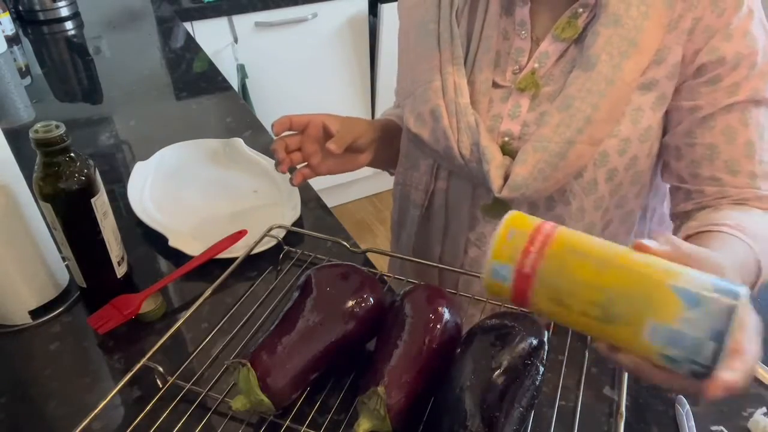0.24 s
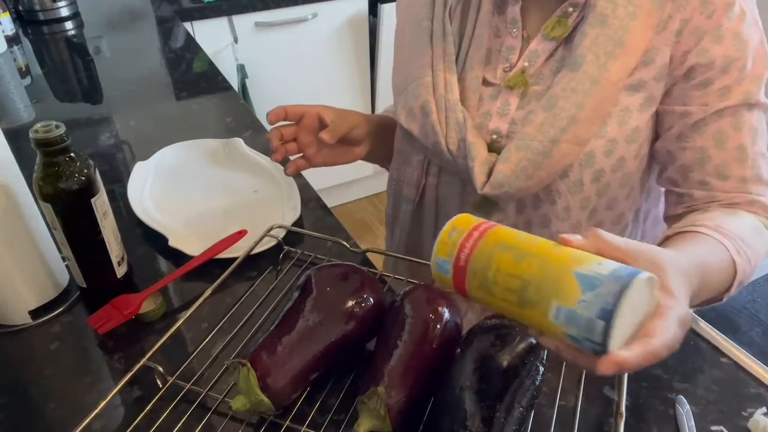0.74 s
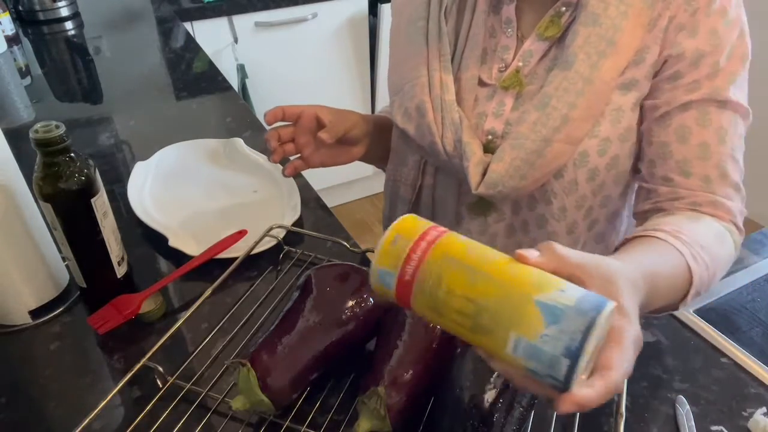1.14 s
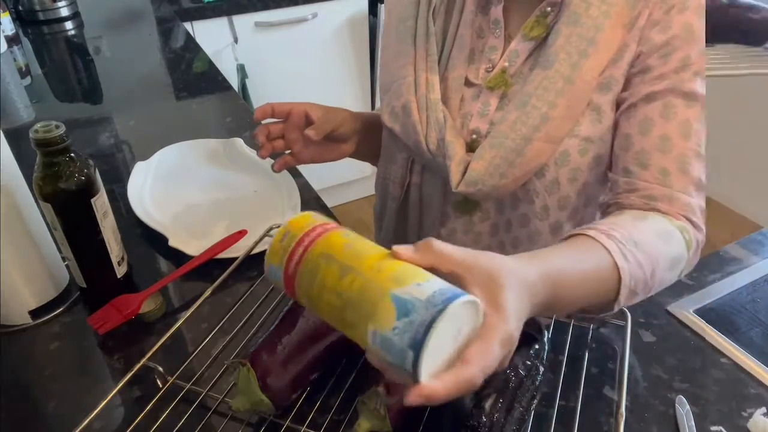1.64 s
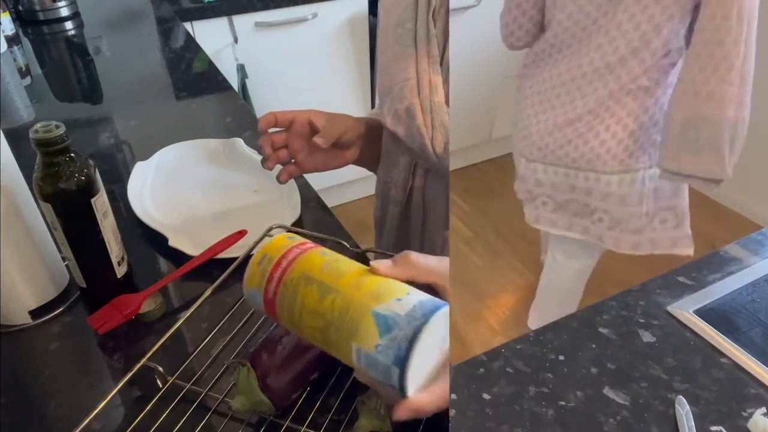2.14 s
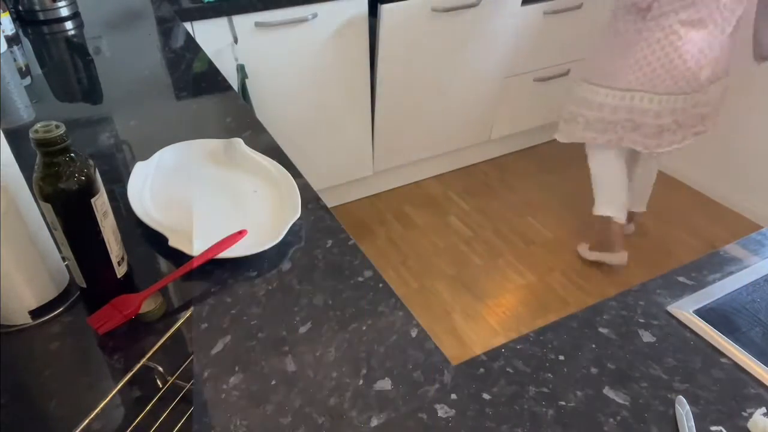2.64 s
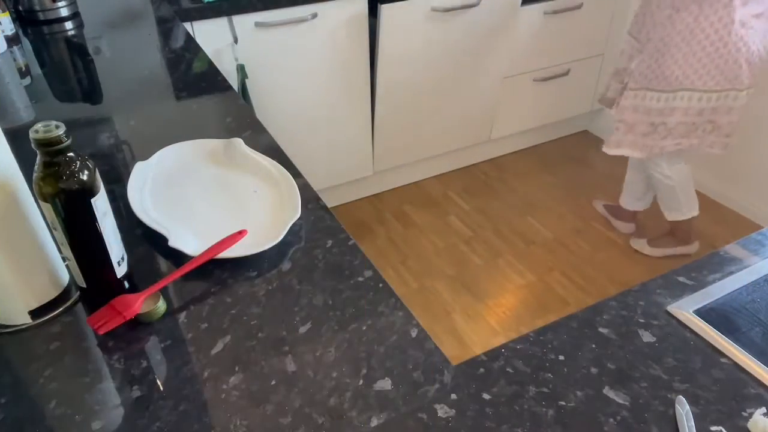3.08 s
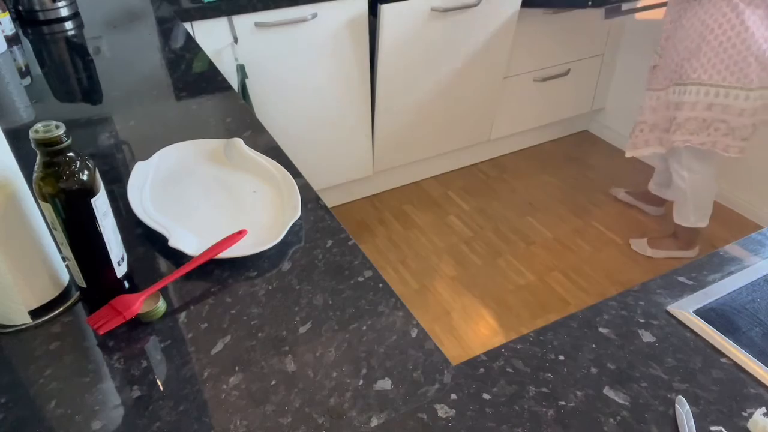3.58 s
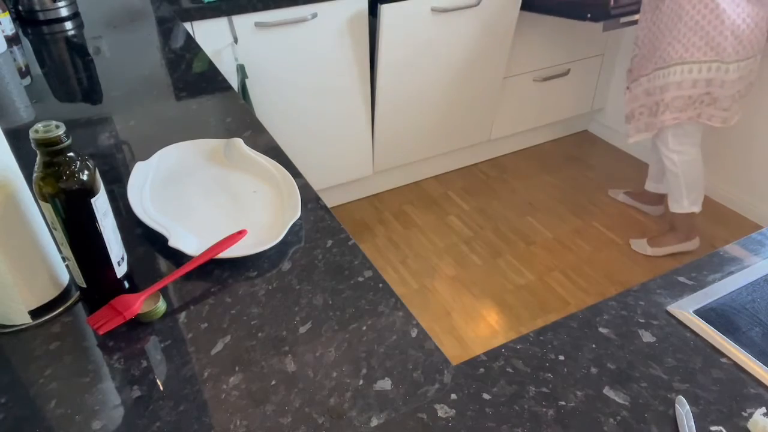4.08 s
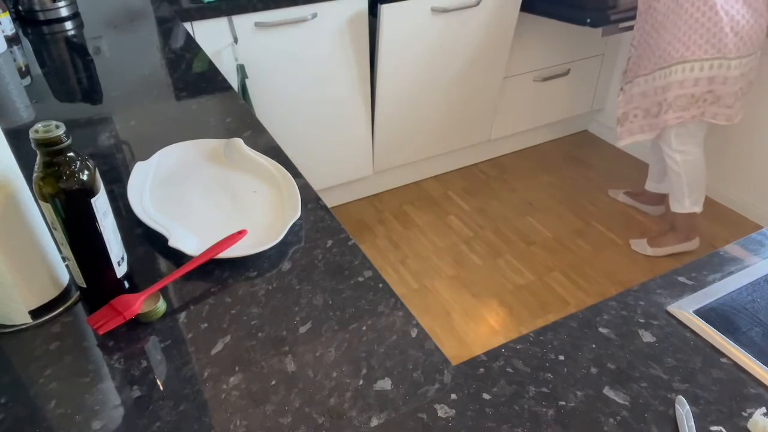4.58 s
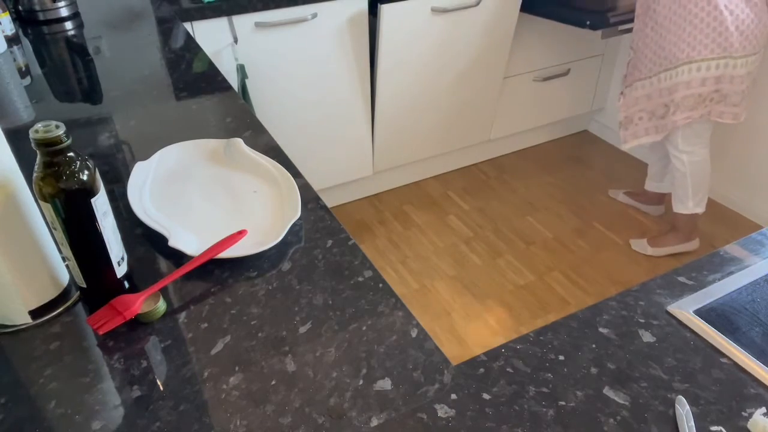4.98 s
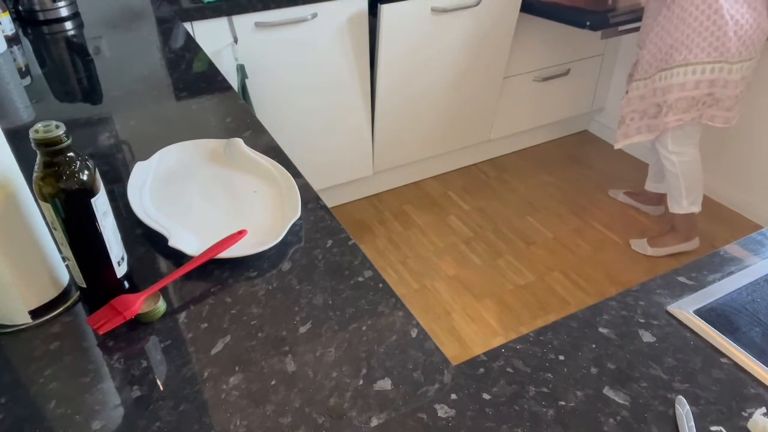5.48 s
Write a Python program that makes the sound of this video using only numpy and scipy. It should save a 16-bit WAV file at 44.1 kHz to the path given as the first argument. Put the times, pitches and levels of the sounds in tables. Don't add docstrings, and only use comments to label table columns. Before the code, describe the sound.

Quick bright shakes of a salt container give way to an oven door clicking open and metal trays banging across the room.

```python
import sys
import numpy as np
from scipy import signal
from scipy.fft import rfft, irfft, next_fast_len
from scipy.io import wavfile
from scipy.ndimage import uniform_filter1d

SR = 44100
rng = np.random.default_rng(int(sys.argv[2]) if len(sys.argv) > 2 else 0)


def log_audio(samples):
    frames = np.atleast_2d(samples).T
    limited = np.clip(frames, -1, 1)
    pcm = np.round(limited * 32767).astype(np.int16)
    wavfile.write(sys.argv[1], SR, pcm)


def decibels_to_gain(level_db):
    exponent = np.asarray(level_db, float) / 20
    return 10 ** exponent


N = 252252
T = np.arange(N) / SR
AGE = np.arange(SR // 2) / SR
LONG = next_fast_len(N, True)
HZ = np.fft.rfftfreq(LONG, 1 / SR)


def evened(x):
    return x / np.sqrt(np.mean(x ** 2) + 1e-20)


def read(points, hz, column=1):
    table = np.transpose(points)
    return np.interp(np.log(hz + 1), np.log(table[0] + 1), table[column])


def colour(x, points):
    octaves_outside = np.log2(np.clip(HZ, points[0][0], points[-1][0]) / (HZ + 1))
    gain = decibels_to_gain(read(points, HZ) - 24 * abs(octaves_outside))
    return evened(irfft(rfft(x, LONG) * gain, LONG)[..., :N])


def ring(x, modes):
    out = 0
    for hz, width_hz, db in modes:
        r = np.exp(-np.pi * width_hz / SR)
        poles = [1, -2 * r * np.cos(2 * np.pi * hz / SR), r * r]
        out = out + decibels_to_gain(db) * (1 - r) * signal.lfilter([1, 0, -1], poles, x)
    return out


def grains(per_s, spread_db):
    luck = rng.random((2, N)) * SR / per_s
    hit = luck < 1
    size = rng.standard_normal((2, N)) * hit
    size[hit] *= decibels_to_gain(spread_db * np.minimum(-np.log(luck[hit] + 1e-9), 5))
    return evened(size)


def wander(rate_hz, depth_db, t=T):
    knots = rng.standard_normal(round(N / SR * 200))
    return np.interp(t * rate_hz, np.arange(len(knots)), decibels_to_gain(depth_db * knots))


def blow(db, t60_s, rise_s):
    return (1 - np.exp(-AGE / rise_s)) * decibels_to_gain(db - 60 * AGE / t60_s)


def stroke(start_s, length_s, edge_s, sag_db_per_s):
    edge = np.clip(np.minimum(T - start_s, start_s + length_s - T) / edge_s + 1, 0, 1)
    return edge * decibels_to_gain(-sag_db_per_s * np.clip(T - start_s, 0, length_s))


def add(mix, start_s, sound):
    part = mix[..., round(start_s * SR):][..., :sound.shape[-1]]
    part += sound[..., :part.shape[-1]]


def ports(pair, table):
    left, own = rfft(pair, LONG)
    likeness = np.clip(read(table, HZ), 0, 1)
    shift = np.exp(1j * np.pi * read(table, HZ, column=2))
    right = likeness * left * shift + np.sqrt(1 - likeness ** 2) * own
    tilt = decibels_to_gain(read(table, HZ, column=3) / 2)
    return irfft(np.array([left * tilt, right / tilt]), LONG)[:, :N]


# frequency in Hz, t60 in seconds.
ROOM_T60 = [(120, 0.35), (500, 0.34), (2000, 0.29), (6000, 0.2), (14000, 0.19)]


def room(x, tail_db):
    taps = np.zeros((2, SR // 2))
    at = np.arange(300, SR // 2 - 20, 20)
    at = at + rng.integers(0, 20, (2, len(at)))
    np.put_along_axis(taps, at, rng.choice([-1., 1.], at.shape), 1)
    hz, t, z = signal.stft(taps, SR, nperseg=512)
    decay = decibels_to_gain(-60 * t / read(ROOM_T60, hz)[:, None])
    tail = signal.istft(z * decay, SR, nperseg=512)[1]
    tail = tail / np.linalg.norm(tail[0])
    return x + decibels_to_gain(tail_db) * signal.oaconvolve(x, tail, axes=1)[:, :N]


# frequency in Hz, level in dB per Hz.
HUM_NEAR_SPECTRUM = [(25, -15), (59, -0.5), (110, -6), (153, -15.5), (300, -27.5), (380, -19.5),
                     (660, -22.5), (800, -18), (1160, -30.5), (2200, -33.5)]
HUM_FAR_SPECTRUM = [(50, -35), (78, -19), (105, 0), (205, -2.5), (300, -13), (400, -23.5), (600, -27),
                    (950, -23), (1200, -22.5), (2100, -29), (3000, -34), (5000, -48), (9000, -49),
                    (13000, -52)]
# time in seconds, share of the far scene 0-1.
FAR_SHARE = [(2.0, 0.09), (2.4, 0.55), (2.8, 0.84), (3.2, 0.99)]


def hum():
    near_db, far_db = -52.5, -52.5
    far = np.clip(np.interp(T, *np.transpose(FAR_SHARE)), 0, 1)
    noise = rng.standard_normal((2, N))
    near_hum = decibels_to_gain(near_db) * colour(noise, HUM_NEAR_SPECTRUM)
    far_hum = decibels_to_gain(far_db) * colour(noise[:, ::-1], HUM_FAR_SPECTRUM)
    return (1 - far) * near_hum + far * far_hum


# start in seconds, level in dB, panel pitch in Hz.
PANEL_THUDS = [(2.99, -46, 105), (3.12, -44, 290), (3.14, -46, 114), (3.49, -41.5, 250), (3.54, -45.5, 228),
               (4.016, -26, 265), (4.045, -36, 295), (4.07, -39, 290), (4.15, -39.5, 275),
               (4.218, -33.5, 239.5), (4.225, -36.5, 134.3), (4.245, -33, 294.5), (4.49, -38, 215),
               (4.68, -27, 240), (4.69, -18.5, 230), (4.692, -17.5, 137.9), (4.71, -25.5, 290),
               (4.77, -31, 140.3), (4.782, -29.5, 285), (4.86, -37, 290), (4.994, -28, 135),
               (5.005, -25.5, 250), (5.035, -29, 295), (5.05, -33, 160), (5.08, -33.5, 240),
               (5.145, -36.5, 220), (5.30, -40, 277), (5.508, -30, 265), (5.54, -42, 300),
               (5.71, -32.5, 280)]
# start in seconds, length in seconds, level in dB.
CABINET_SHAKING = [
    (3.1, .4, -48),
    (3.65, .3, -62),
    (4.12, .55, -49),
    (4.72, .17, -44),
    (5.03, .7, -48),
]
# frequency in Hz, level in dB.
RUMBLE_SPECTRUM = [(70, -20), (110, 1), (150, -1.5), (190, -6), (250, 0.5), (320, -6), (430, -21),
                   (550, -30.5)]
SHUDDER_SPECTRUM = [(170, -9), (260, 0), (400, -1), (520, -9)]


def cabinet():
    cycles_per_60_db, rise_s = 23, .008
    shudder_db, shudder_t60_s = -16.5, .18
    shaking_edge_s, shaking_sag_db_per_s = .1, 9
    level = 0
    for start_s, length_s, db in CABINET_SHAKING:
        level = level + decibels_to_gain(db - 4.5) * stroke(start_s, length_s, shaking_edge_s, shaking_sag_db_per_s)
    noise = rng.standard_normal((2, N))
    shudder = np.zeros(N)
    out = level * wander(25, 2.9) * colour(noise, RUMBLE_SPECTRUM)
    for start_s, db, hz in PANEL_THUDS:
        add(out, start_s, blow(db + 7, cycles_per_60_db / hz, rise_s) * np.sin(2 * np.pi * hz * AGE))
        add(shudder, start_s, blow(db + shudder_db, shudder_t60_s, rise_s))
    return out, shudder * colour(noise[:, ::-1], SHUDDER_SPECTRUM)


# frequency in Hz, level in dB.
CLATTER_SPECTRUM = [(400, -9), (600, -10), (900, 0), (2500, -4), (5000, -12.5), (8000, -19)]
TICK_SPECTRUM = [(3500, -14), (6000, -3), (9000, -5), (12000, -5), (13400, -6), (15500, -14)]
# start in seconds, click in dB, struck part in Hz, brightness in dB.
LATCH_CLICKS = [(2.922, -56, 1400, 3.5), (2.974, -37.5, 1250, -26), (3.010, -43, 1300, -7.5),
                (3.078, -38, 1900, -.6), (3.098, -42, 950, -14), (3.139, -31.5, 1850, -18),
                (3.284, -57, 4000, -5), (3.290, -46.5, 740, -26), (3.44, -53, 950, -6),
                (3.462, -45.5, 2100, -1.5), (3.476, -31, 3800, -0.6), (3.498, -39, 1090, -10)]


def latch():
    t60_s, base_rise_s, rise_s_per_dull_db = .13, .0014, .00012
    out = np.zeros((2, N))
    impacts = grains(14000, 1.3)
    broad = colour(impacts, CLATTER_SPECTRUM)
    ticks = colour(impacts, TICK_SPECTRUM)
    for k, (start_s, db, hz, bright_db) in enumerate(LATCH_CLICKS):
        first = k * len(AGE) // 2
        mine = slice(first, first + len(AGE))
        rise_s = base_rise_s + rise_s_per_dull_db * abs(bright_db)
        part = evened(ring(impacts[:, mine], [(hz, 0.2 * hz, 0), (0.61 * hz, 0.29 * hz, -6)]))
        add(out, start_s, blow(db - 6.5, t60_s, rise_s) * (part + 0.3 * broad[:, mine]))
        add(out, start_s, blow(db - 1.5 + bright_db, .8 * t60_s, 0.52 * rise_s) * ticks[:, mine])
    return out


# frequency in Hz, width in Hz, level in dB.
TRAY_MODES = [(416, 70, -16), (835, 60, -.3), (1060, 75, -4.5), (1250, 60, -3), (1496, 60, -11),
              (1754, 60, -7), (1987, 38, 1.5), (2080, 40, -8), (2333, 32, -5.5), (2683, 91, -3),
              (3160, 69, -6.5), (3800, 99, -6), (4203, 100, -4.5), (5290, 66, -10.5), (6250, 71, -10),
              (6770, 77, -10), (8250, 110, -16)]


def metal(strength, brightness, impacts):
    pitch_drift_db = .12
    body = strength * decibels_to_gain(-2.5) * wander(60, 2.3) * colour(impacts, CLATTER_SPECTRUM)
    late = slice(3 * SR, N)
    drive = (strength * impacts)[:, late] / np.std(ring(impacts[:1, :SR // 4], TRAY_MODES))
    for hz, width_hz, db in TRAY_MODES:
        phase = 2 * np.pi * hz * np.cumsum(wander(6, pitch_drift_db, T[late])) / SR
        turn = np.exp(1j * phase)
        push = decibels_to_gain(db - .6) * wander(24, 3.5, T[late]) * wander(7, 2.6, T[late])
        r = np.exp(-np.pi * width_hz / SR)
        swing = signal.lfilter([1 - r], [1, -r], push * turn.conj() * drive)
        body[:, late] += (turn * swing).real
    return body + brightness * wander(60, 2.4) * colour(impacts, TICK_SPECTRUM)


# start in seconds, rattle in dB, brightness in dB, t60 in seconds.
TRAY_KNOCKS = [(4.012, -32, -33, .16), (4.11, -47.5, -13, .21), (4.142, -31, -10.5, .17),
               (4.214, -23, -10, .27), (4.239, -28.5, -15.5, .07), (4.638, -41, -9, .14),
               (4.666, -31, -14, .14), (4.677, -16.5, -13.5, .14), (4.692, -15.5, -17, .15),
               (4.779, -26, -24, .14), (4.860, -27, -37, .08), (4.991, -24, -19.5, .17),
               (5.011, -21.5, -17.5, .14), (5.039, -26, -14, .085), (5.289, -38, -16, .11),
               (5.458, -31.5, -21, .32), (5.509, -33, -22, .095), (5.609, -50, -17, .13)]
# start in seconds, length
# in seconds, scrape in dB, brightness in dB.
DOOR_AND_TRAY_SLIDES = [(3.19, .03, -64, -14), (3.23, .16, -79, 8), (3.295, .015, -62, -8), (3.41, .06, -62, -2),
                        (4.29, .03, -50, -15), (4.35, .03, -50, -4), (4.405, .15, -42, -1), (4.635, .04, -47, -9),
                        (4.885, .02, -54, -28), (4.975, .015, -52, -13), (5.09, .28, -45, -6), (5.42, .03, -53, -9),
                        (5.54, .015, -55, -13), (5.625, .02, -58, -11)]


def trays():
    knock_rise_s = .0038
    slide_edge_s, sag_db_per_s, dulling_db_per_s = .045, 8, 40
    strength, bright = np.zeros((2, N))
    for start_s, db, bright_db, t60_s in TRAY_KNOCKS:
        add(strength, start_s, blow(db - 9.5, t60_s, knock_rise_s))
        add(bright, start_s, blow(db - 2.5 + bright_db, 0.92 * t60_s, .6 * knock_rise_s))
    for start_s, length_s, db, bright_db in DOOR_AND_TRAY_SLIDES:
        strength += decibels_to_gain(db - 2.1) * stroke(start_s, length_s, slide_edge_s, sag_db_per_s)
        bright += decibels_to_gain(db + bright_db) * stroke(start_s, length_s, slide_edge_s, dulling_db_per_s)
    return metal(strength, bright, grains(11000, 1.63))


# start in seconds, level in dB, t60 in seconds, spacing of echo dips in Hz.
DISH = (5.669, -38, 0.5, 4900)
# frequency in Hz, level in dB.
DISH_SPECTRUM = [(500, -7), (850, 6.5), (1600, -13.5), (2900, -5.5), (4300, 0), (5000, -14), (5900, -3),
                 (8100, -8.5), (11000, -12.5), (15500, -12)]


def clack():
    start_s, db, t60_s, dip_hz = DISH
    chatter = colour(grains(14000, 1.1), DISH_SPECTRUM)[:, :len(AGE)]
    chatter = (chatter[0] + .45 * chatter[::-1]) * decibels_to_gain([[1.1], [-1.1]])
    echo = .85 * np.roll(chatter, round(SR / dip_hz), axis=1)
    out = np.zeros((2, N))
    add(out, start_s, blow(db, t60_s, .003) * (chatter - echo))
    return out


def patchy(x, depth_db):
    z = signal.stft(x[:, :N // 2 + SR // 2], nperseg=256)[2]
    patches = rng.standard_normal(z.shape[1:])
    patches = uniform_filter1d(patches, size=3, axis=0)
    patches = uniform_filter1d(patches, size=9, axis=1)
    part = signal.istft(z * decibels_to_gain(depth_db * evened(patches)), nperseg=256)[1]
    return np.pad(evened(part), [(0, 0), (0, N - part.shape[1])])


# peak in seconds, level in dB.
SHAKE_STROKES = [(0.007, -44), (0.083, -45), (0.23, -36.5), (0.319, -42.5), (0.459, -41.5), (0.543, -43),
                 (0.615, -37), (0.717, -42), (0.79, -40.5), (0.882, -37.5), (0.959, -40.5), (1.058, -37),
                 (1.127, -39), (1.226, -36.5), (1.303, -38.5), (1.401, -38.5), (1.463, -38.5), (1.556, -40),
                 (1.632, -36.5), (1.716, -38), (1.789, -40), (1.877, -42), (1.944, -39.5), (2.051, -42),
                 (2.116, -46), (2.205, -41.5), (2.288, -45)]
# peak in seconds, level in dB, rise in seconds, fall in seconds.
TRICKLES = [
    (.135, -51.5, .017, .035),
    (.405, -51, .03, .04),
    (2.37, -56.5, .035, .07),
    (2.48, -69.5, .06, .06),
    (2.6, -56.5, .089, .17),
    (2.72, -53, .11, .071),
    (2.84, -67.5, .054, .11),
]
# time in seconds, level in dB.
DRUM_TURN = [(0, -5), (1.1, -5), (1.65, -9), (2.8, -7.5)]
# frequency in Hz, level in dB.
FIZZ_SPECTRUM = [(5000, -42.5), (7000, -8.5), (9000, -3.5), (10800, -2), (11900, 1.5), (13000, -1.5),
                 (14500, -5), (15600, -4.5)]
DRUM_SPECTRUM = [(600, -20.5), (1200, -12.5), (1900, -12.5), (2600, -5.5), (4000, -1.5), (6200, -0.5),
                 (7500, -5.5), (9500, -29)]
# frequency in Hz, likeness 0-1, right lead in half turns, left over right in dB.
NEAR_PORT_TABLE = [(300, 0.33, 0.5, 4.5), (2500, 0.42, -0.07, 2.5), (4200, 0.01, -0.3, 3.5),
                   (5660, 0.04, 0.16, 4.5), (7260, 0.93, 1.05, 3.5), (8400, 0.94, 1.05, 1),
                   (9660, 0.8, 1.5, .6), (10700, 0.9, 1.8, .1), (12400, 0.97, 2, .1), (13300, .65, 2, .1),
                   (14500, 0.98, 3, 0.5)]


def rush_envelope():
    t = np.arange(0, 3.5, .002)
    last_wait_s, longest_settle_s = .09, .063
    peaks, levels = np.transpose(SHAKE_STROKES)
    waits = np.r_[last_wait_s, np.diff(peaks), last_wait_s]
    rises = .026 + .16 * waits[:-1]
    falls = np.minimum(.006 + .55 * waits[1:], longest_settle_s)
    power = 0
    for peak_s, db, rise_s, fall_s in list(zip(peaks, levels, rises, falls)) + list(TRICKLES):
        distance = abs((t - peak_s) / np.where(t < peak_s, rise_s, fall_s))
        power = power + decibels_to_gain(db - 16.3 * distance ** 2.04) ** 2
    return np.interp(T, t, np.sqrt(power))


def shaker():
    rush = rush_envelope()
    fizz_level = decibels_to_gain(1.1) * rush
    drum_level = decibels_to_gain(np.interp(T, *np.transpose(DRUM_TURN)) + .56) * wander(9, .6) * rush
    impacts = grains(15000, 1.07)
    fizz = fizz_level * patchy(colour(impacts, FIZZ_SPECTRUM), 1.9)
    drum = drum_level * patchy(colour(impacts, DRUM_SPECTRUM), 1.8)
    return ports(room(fizz + drum, -16), NEAR_PORT_TABLE)


# frequency in Hz, likeness 0-1, right lead in half turns, left over right in dB.
FAR_PORT_TABLE = [(60, 0.96, 0.01, 2.5), (170, .98, 0.01, 1.8), (280, .85, -.08, 2.6), (450, .6, 0.01, -.6),
                  (805, 0.58, 0.11, 1.1), (1500, 0.16, 0.33, 1.8), (4500, 0.35, 0.29, 2.3),
                  (12500, .3, 0.78, 5), (13800, 0.92, 1.01, 1.1)]


def scene():
    blows, shudder = cabinet()
    oven = room(latch() + trays() + shudder, -5.5)
    far = ports(oven + blows + hum(), FAR_PORT_TABLE)
    return shaker() + far + clack()


def top_cut(x):
    return signal.sosfilt(signal.butter(12, 15830, fs=SR, output="sos"), x)


def record(dry):
    return top_cut(dry)


dry = scene()
out = record(dry)
log_audio(out)
```